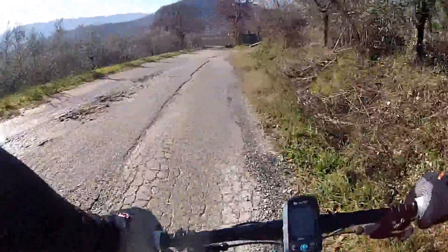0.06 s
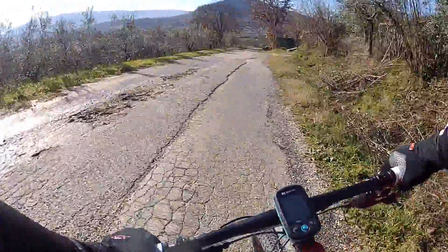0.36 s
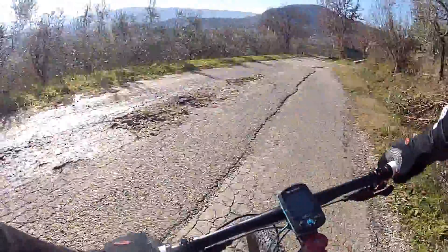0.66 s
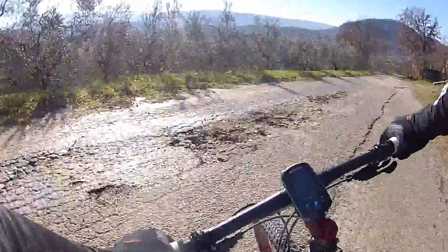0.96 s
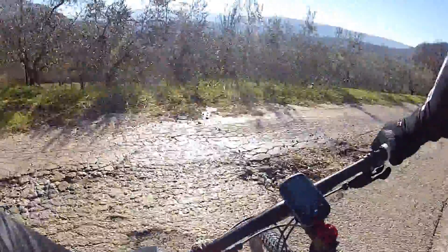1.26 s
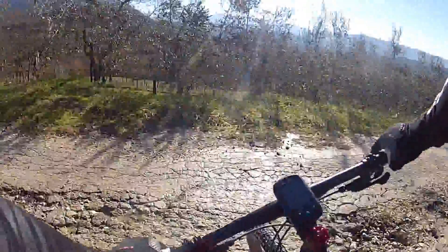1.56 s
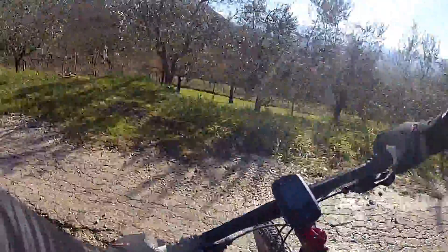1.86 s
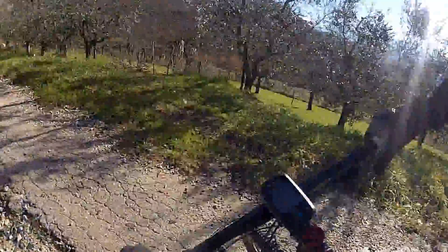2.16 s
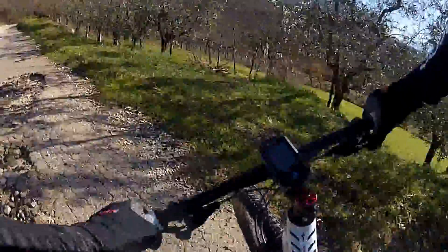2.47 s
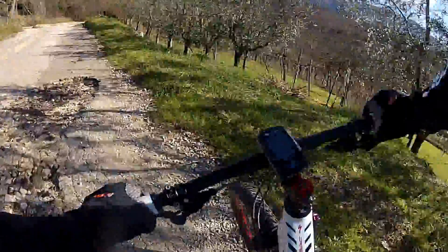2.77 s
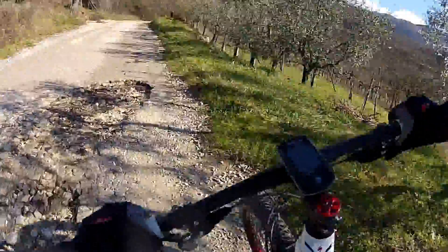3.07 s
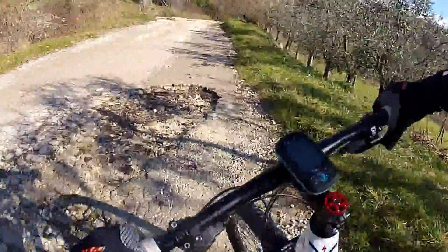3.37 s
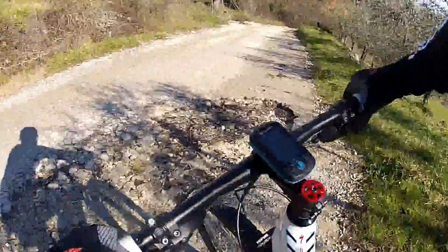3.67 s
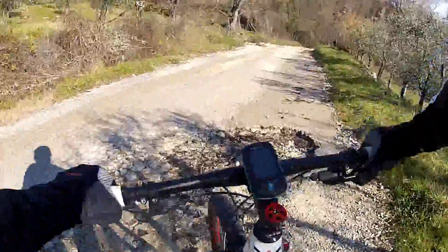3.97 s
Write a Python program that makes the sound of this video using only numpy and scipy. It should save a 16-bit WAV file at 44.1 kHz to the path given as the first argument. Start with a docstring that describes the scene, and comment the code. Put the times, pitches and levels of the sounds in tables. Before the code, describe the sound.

A bicycle disc brake squeals and fades to a rasp over wind, tyre rush and a ticking freewheel. Grit snaps, the chain slaps and bumps shake the frame, heard outdoors from the rider's position.

```python
"""A disc brake squeals over rushing wind and tyres as a mountain bike slows into a bend on cracked asphalt.
The pads stick and slip on the brake disc, then fade to a rub, while the freewheel ticks.
Grit snaps off the tyres, the chain slaps, and bumps shake the frame; the hardest sets the disc ringing.
Wind and tyre rush fall with the speed. All is heard from the rider's place, through a recorder
that holds coarse samples and so mirrors the sound into a glassy treble."""
import sys
import numpy as np
from scipy import signal
from scipy.fft import rfft, irfft
from scipy.io import wavfile

SR = 44100
rng = np.random.default_rng(int(sys.argv[2]) if len(sys.argv) > 2 else 0)


def put_to_file(sound):
    """Save the sound as 16-bit audio at rate SR, in the file named by the first command-line argument."""
    columns = np.atleast_2d(sound).T  # one column per channel
    safe = np.clip(columns, -1, 1)
    whole_steps = np.round(safe * 32767)
    wavfile.write(sys.argv[1], SR, whole_steps.astype(np.int16))


N = 176400
TIME = np.arange(N) / SR
HIT_TIME = TIME[:SR // 5]  # each hit lasts 0.2 seconds


# The squeal's lowest tone. Each row: time in seconds, pitch in Hz.
SQUEAL_HZ = [(.39, 835), (.47, 826), (.6, 823), (.78, 824), (.865, 836), (.96, 824), (1.03, 834),
             (1.5, 842)]
# That tone, its octave and its shrill sixth multiple. Each row: time in seconds, level in dB.
LOW_DB = [(.37, -57), (.42, -31.5), (.5, -29), (.6, -29.5), (.71, -25.5), (.79, -33.5), (.89, -33),
          (1.0, -35.5), (1.04, -48.5), (1.4, -46), (1.51, -50), (1.6, -100)]
OCTAVE_DB = [(.38, -49), (.44, -34.5), (.49, -22.5), (.565, -18), (.62, -30.5), (.69, -22), (.8, -27.5),
             (.89, -28.5), (.935, -23), (.97, -36.5), (1.08, -44), (1.22, -52), (1.4, -100)]
SHRILL_DB = [(.405, -70), (.425, -37), (.48, -35.5), (.54, -31), (.558, -60), (.58, -35.5), (.65, -35),
             (.68, -49), (.73, -40), (.79, -39), (.85, -42), (.88, -70), (1.05, -85)]
# How hard the pads bite. Each row: time in seconds, overtone level in dB.
BITE_DB = [(.39, -57), (.425, -39), (.485, -24), (.54, -57), (.585, -31.5), (.65, -33.5), (.69, -56),
           (.73, -31), (.785, -32.5), (.86, -48.5), (.96, -58), (1.1, -80)]
# The overtones. Each row: multiple of the pitch, dB added to the bite.
BITE_TONES = [(3, -3.5), (4, 3.5), (5, -8.5), (7, -23)]
# The squeal breaks up as it fades. Each row: time in seconds, roughness from 0 to 1.
ROUGHNESS = [(.4, .2), (.55, .09), (.7, .15), (.85, .27), (1.0, .4), (1.2, .55)]

def squeal():
    """Pads stick and slip on the disc: one wobbling pitch, whose overtones come and go with the bite."""
    hz = curve(SQUEAL_HZ) * (1 + .004 * drift(per_s=30))
    phase = 2 * np.pi * np.cumsum(hz) / SR
    tones = [(1, curve(LOW_DB)), (2, curve(OCTAVE_DB)), (6, curve(SHRILL_DB))]
    tones += [(multiple, curve(BITE_DB) + db) for multiple, db in BITE_TONES]
    return sum(from_db(db) * rough_tone(multiple * phase, curve(ROUGHNESS)) for multiple, db in tones)


# The pads' rub. Each row: time in seconds, level in dB.
RUB_DB = [(.8, -47), (1.0, -55), (1.15, -49.5), (1.3, -50), (1.44, -45), (1.52, -43.5), (1.6, -52),
          (1.68, -80)]
# Its tone colour. Each row: frequency in Hz, strength in dB.
RUB_TONE = [(1700, -18), (2150, 3.5), (2600, -22), (2950, 9), (3400, -13), (4250, 1.5), (5200, -39)]

def rub():
    """As the lever eases, the pads only rasp over the disc."""
    return from_db(curve(RUB_DB) + 1.5 * drift(per_s=70)) * noise(RUB_TONE)


# The freewheel's speed. Each row: time in seconds, ticks per second.
TICK_RATE = [(0, 59), (.25, 53.5), (.9, 50), (1.15, 51.5), (1.37, 61), (1.6, 64), (1.9, 55.5), (2.45, 43.5),
             (3.2, 32.5), (4, 35)]
# Its loudness. Each row: time in seconds, level in dB.
TICK_DB = [(0, -49), (.45, -42.5), (.8, -44), (1.0, -48), (1.25, -47), (1.35, -46.5), (1.52, -45),
           (1.65, -63), (2.1, -65.5), (2.3, -54.5), (2.6, -68), (4, -66)]
# The ring of small metal parts. Each row: frequency in Hz, strength in dB.
METAL_TONE = [(900, -5), (1600, -44.5), (2200, -1), (3000, 4), (3600, -6), (4300, -5), (5000, 1),
              (5800, -30)]

def freewheel():
    """Little catches drop over the ratchet's teeth, each with a short bright rasp."""
    spread_db, decay_s = 2.5, 0.0018
    rate = curve(TICK_RATE)
    teeth = np.cumsum(rate) / SR
    strength = from_db(spread_db * rng.standard_normal(1000))[teeth.astype(int)]
    age = (teeth % 1) / rate / decay_s  # decay times since the last tooth
    ticks = strength * age * np.exp(-age) * rng.standard_normal(N)
    return from_db(curve(TICK_DB)) * coloured(ticks, METAL_TONE)


# Flying grit. Each row: start in seconds, peak in dB, pitch in Hz, ring time in seconds.
STONE_SNAPS = [(0.2892, -16.5, 2390, 0.012), (0.2972, -12, 2600, 0.011), (.3018, -9, 2720, 0.0063),
               (.3475, -11.5, 2740, 0.0043), (0.3811, 0.5, 2135, 0.0064), (0.397, -15, 2830, 0.015),
               (0.469, -11, 2640, 0.0023), (1.328, -27, 3000, 0.011), (1.356, -29, 1690, .012),
               (1.389, -15, 2350, 0.0038), (1.554, -24.5, 3600, 0.0036), (1.6045, -19.5, 3000, .009),
               (1.917, -35, 3200, 0.013), (1.933, -31, 3680, 0.0054), (2.253, -20.5, 2860, 0.0048),
               (2.531, -26, 2380, 0.0051), (3.0405, -15, 2170, 0.0045), (3.18, -30.5, 1270, 0.0041),
               (3.299, -22.5, 2920, 0.0047), (3.4, -30.5, 2160, 0.016), (3.551, -21, 2080, 0.0091),
               (3.7069, -16, 2250, 0.0038)]

def stones():
    """Each stone snaps off a tyre with a ping, a crack and a small knock."""
    out = np.zeros(N)
    crack_band = signal.butter(2, [1200, 5000], "band", fs=SR, output="sos")
    knock = from_db(-18.5) * ring(hz=600, ring_s=0.024)
    for start, db, hz, ring_s in STONE_SNAPS:
        crack = signal.sosfilt(crack_band, burst(ring_s / 5))
        snap = ring(hz, ring_s) + from_db(-11) * crack / abs(crack).max() + knock
        snap *= fade_in(rise_s=0.00017)
        add(out, start, from_db(db) * snap / abs(snap).max())
    return out


# Chain slaps. Each row: start in seconds, level in dB, pitch factor.
CHAIN_SLAPS = [(2.5453, -22, 1.02), (2.64, -37.5, 1.11), (2.6894, -21, 1.02), (2.7622, -33, 1.14),
               (2.874, -39, 1.17), (2.9763, -23, 1.005), (3.054, -33, .9), (3.0963, -30.5, 0.987)]
# The chain's tones at factor 1. Each row: pitch in Hz, strength in dB, ring time in seconds.
CHAIN_TONES = [(2010, -17, 0.06), (2700, 1.5, 0.0046), (2914, 2.5, 0.011), (3190, 3.5, 0.0075),
               (3360, -5, 0.004), (4060, -6.5, 0.0041), (4790, -10, 0.032)]

def chain():
    """The chain slaps the frame with short metallic clacks."""
    out = np.zeros(N)
    low_hz = 1530
    for start, db, pitch in CHAIN_SLAPS:
        clack = struck(CHAIN_TONES, pitch, low_hz, contact_s=0.0022) * fade_in(rise_s=0.0007)
        add(out, start, from_db(db) * unit_hit(cut_bass(clack, low_hz)))
    return out


# Road bumps. Each row: start in seconds, thud in dB, rattle in dB, the thud's pitch factor.
ROAD_BUMPS = [(1.356, -33.5, -36, 1.11), (1.664, -29.5, -45.5, 1.07), (2.195, -33.5, -52, 0.35),
              (2.219, -32, -52, 0.73), (2.237, -26.5, -45, 0.95), (2.28, -35.5, -37.5, 0.94),
              (2.397, -37.5, -55, .6), (2.522, -41, -48, 0.92), (2.64, -40.5, -43, 1.16),
              (2.671, -38, -45, 1.5), (2.697, -36.5, -50, 1.06), (2.766, -38, -41, 1.3),
              (2.853, -45, -42.5, 1.2), (2.877, -39.5, -46, 1.3), (3.033, -30, -32.5, 1.16),
              (3.095, -24.5, -33, 0.99), (3.4509, -19.5, -24, 0.91), (3.48, -33, -32.5, 2.05),
              (3.4914, -18, -21.5, 1.05), (3.506, -20.5, -46, 0.89), (3.766, -36.5, -32, 0.64),
              (3.982, -42, -47, 0.76)]
# The frame's tones at factor 1. Each row: pitch in Hz, strength in dB, ring time in seconds.
FRAME_TONES = [(190, -20, 0.076), (285.6, 0.5, 0.22), (348, 0, 0.14), (451, 2.5, 0.038), (553, -2, 0.032),
               (668, -5, 0.089), (892, -12.5, 0.013), (1210, -21.5, 0.011)]

def bumps():
    """At each bump the frame thuds and loose parts rattle."""
    out = np.zeros(N)
    rattle_decay_s = 0.013
    for start, thud_db, rattle_db, pitch in ROAD_BUMPS:
        rattle = noise(HISS_TONE, len(HIT_TIME)) * np.exp(-HIT_TIME / rattle_decay_s)
        thud = struck(FRAME_TONES, pitch, low_hz=195, contact_s=0.005)
        add(out, start, from_db(thud_db) * thud + from_db(rattle_db) * unit_hit(rattle))
    return out


# The brake disc's tones. Each row: pitch in Hz, level in dB, ring time in seconds.
DISC_TONES = [(293.8, -41, .75), (436, -43.5, 1.4), (663, -39.5, 1.74), (748, -40, 0.43), (797, -40, 0.56),
              (868, -43, 1.3), (1674, -45, 0.46), (2080, -49, .3), (2900, -45, 0.19), (2800, -39, 0.2)]

def disc_ring():
    """The hardest bump leaves the brake disc ringing unevenly."""
    out = np.zeros(N)
    for hz, db, ring_s in DISC_TONES:
        tone = rough_tone(2 * np.pi * hz * TIME, roughness=0.49)
        add(out, start=3.494, sound=from_db(db) * tone * fade_out(TIME, ring_s))
    return out


# Loose gravel on the broken road. Each row: time in seconds, level in dB.
GRAVEL_DB = [(1.2, -75), (1.6, -54.5), (2.1, -62.5), (2.3, -72), (2.7, -54.5), (3.2, -53), (3.6, -50),
             (4, -62.5)]

def gravel():
    """Small stones spray against the metal of the bike."""
    decay_s = 0.0021
    spray = signal.fftconvolve(clicks(per_s=65, spread_db=3), np.exp(-HIT_TIME / decay_s))[:N]
    return from_db(curve(GRAVEL_DB)) * coloured(spray * rng.standard_normal(N), METAL_TONE)


# Tyre rumble and hiss. Each row: time in seconds, level in dB.
RUMBLE_DB = [(0.0, -40), (0.36, -35), (0.57, -40), (0.68, -40), (0.85, -41), (0.97, -43), (1.06, -44),
             (2.05, -46), (2.34, -43.5), (3.36, -45.5), (3.64, -42.5), (4.0, -45)]
HISS_DB = [(0, -38), (.2, -36.5), (.45, -33), (.65, -44), (.95, -50.5), (1.6, -59.5), (1.8, -58.5),
           (2.15, -59.5), (2.25, -45.5), (2.45, -55.5), (2.95, -52.5), (3.05, -53.5), (3.22, -58),
           (3.44, -50.5), (3.53, -34), (3.63, -54), (3.8, -51.5), (4, -54.5)]
# Their tone colours. Each row: frequency in Hz, strength in dB.
RUMBLE_TONE = [(100, -14.5), (200, -8.5), (250, -3.5), (285, 5), (340, -6), (430, -2), (520, -6.5),
               (650, -2), (780, -13), (1050, -20.5), (2000, -24)]
HISS_TONE = [(500, -4.5), (1000, -9), (1400, -11), (2100, 2.5), (2500, -5), (2950, 3), (3600, -7),
             (4800, -15.5), (5500, -25.5)]

def tyres():
    """The tyres rumble through the frame, their tread hisses and fine grit crunches."""
    rumble = from_db(curve(RUMBLE_DB) + 2.34 * drift(per_s=17)) * noise(RUMBLE_TONE)
    grains = clicks(per_s=450, spread_db=4.5) * rng.choice([-1, 1], N)
    tread = noise(HISS_TONE) + from_db(-2) * coloured(grains, HISS_TONE)
    return rumble + from_db(curve(HISS_DB) + 3.1 * drift(per_s=12.7)) * tread


# The wind. Each row: time in seconds, level in dB.
WIND_DB = [(0, -32), (.3, -40.5), (.5, -42), (.85, -48.5), (1.2, -48.5), (1.7, -53.5), (2.1, -45.5),
           (2.55, -58.5), (2.83, -48.5), (3.2, -60), (3.6, -67), (4, -65)]
# Its tone colour. Each row: frequency in Hz, strength in dB.
WIND_TONE = [(20, -4.5), (40, -2), (70, -1), (110, -2), (180, -7.5), (350, -23), (900, -65)]

def wind():
    """Air buffets the microphone in low, lumpy gusts."""
    return from_db(curve(WIND_DB) + 3.1 * drift(per_s=16)) * noise(WIND_TONE)


def from_db(db):
    """Turn decibels into a volume factor."""
    return 10 ** (np.asarray(db) / 20)


def unit_level(x):
    """Scale a sound to an average (rms) level of 1."""
    return x / np.sqrt(np.mean(x ** 2) + 1e-20)


def unit_hit(x):
    """Give a hit the energy of 10 milliseconds at level 1."""
    return x / np.sqrt(np.sum(x ** 2) / (SR / 100) + 1e-20)


def curve(rows):
    """Join (time, value) rows by straight lines."""
    return np.interp(TIME, *np.transpose(rows))


def coloured(x, colour):
    """Give a sound a tone colour of (Hz, dB) rows, at level 1."""
    hz, db = np.transpose(colour)
    f = np.maximum(np.fft.rfftfreq(len(x), 1 / SR), 1)
    gain = from_db(np.interp(np.log(f), np.log(hz), db))
    edge_fade = np.minimum(1, f / hz[0]) * np.minimum(1, hz[-1] / f) ** 2
    return unit_level(irfft(rfft(x) * edge_fade * gain, len(x)))


def noise(colour, length=N):
    """A steady rush with a tone colour."""
    return coloured(rng.standard_normal(length), colour)


def drift(per_s):
    """A smooth random wander, about 1 in size."""
    f = np.fft.rfftfreq(N, 1 / SR)
    return unit_level(irfft(rfft(rng.standard_normal(N)) / (1 + (f / per_s) ** 2), N))


def rough_tone(phase, roughness):
    """A tone at level 1 whose strength and timing flutter."""
    tone = (1 + roughness * drift(per_s=65)) * np.sin(phase)
    tone += roughness * drift(per_s=65) * np.cos(phase)
    return tone / np.sqrt(.5 + roughness ** 2)


def clicks(per_s, spread_db):
    """Clicks of uneven size at random moments."""
    return (rng.random(N) < per_s / SR) * from_db(spread_db * np.minimum(rng.exponential(1, N), 4))


def fade_in(rise_s):
    """Soften the start of a hit."""
    return 1 - np.exp(-HIT_TIME / rise_s)


def fade_out(t, ring_s):
    """Fall by 60 dB over the ring time."""
    return np.exp(-np.log(1000) * t / ring_s)


def ring(hz, ring_s):
    """One dying tone of a struck object."""
    return np.sin(2 * np.pi * hz * HIT_TIME) * fade_out(HIT_TIME, ring_s)


def burst(decay_s):
    """A dying cluster of tiny contacts."""
    return rng.standard_normal(len(HIT_TIME)) * np.exp(-HIT_TIME / decay_s)


def cut_bass(x, hz):
    """Small objects give off no bass."""
    return signal.sosfilt(signal.butter(2, hz, "high", fs=SR, output="sos"), x)


def struck(tones, pitch, low_hz, contact_s):
    """A rough contact sets each tone of an object ringing."""
    out = 0
    for hz, db, ring_s in tones:
        tone = signal.fftconvolve(burst(contact_s), ring(hz * pitch, ring_s))[:len(HIT_TIME)]
        out = out + from_db(db) * unit_hit(cut_bass(tone, low_hz * pitch))
    return unit_hit(out)


def add(out, start, sound):
    """Mix a sound in at a start time in seconds."""
    i = int(start * SR)
    out[i:i + len(sound)] += sound[:N - i]


def scene():
    """The whole bike in open air, in one channel."""
    riding = squeal() + rub() + freewheel() + wind() + tyres() + gravel()
    return (riding + stones() + chain() + bumps() + disc_ring())[None]


def record(dry):
    """Holding 12,000 samples a second mirrors the sound about 6 and 12 kHz; the very top is cut."""
    sampler_cut_hz, top_hz = 5820, 15600
    dull = signal.sosfilt(signal.ellip(6, .5, 50, sampler_cut_hz, fs=SR, output="sos"), dry)
    coarse = signal.resample_poly(dull, 40, 147, axis=-1)  # down to 12 kHz
    held = np.repeat(coarse, 4, axis=-1)  # up to 48 kHz
    glassy = signal.resample_poly(held, 147, 160, axis=-1)[:, :N]  # back to SR
    return signal.sosfilt(signal.ellip(10, .1, 80, top_hz, fs=SR, output="sos"), glassy)


dry = scene()
out = record(dry)
put_to_file(out)
```